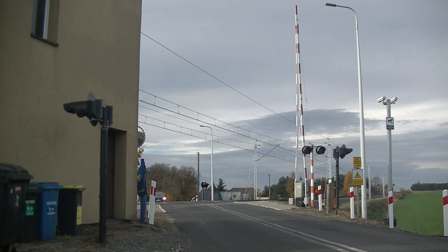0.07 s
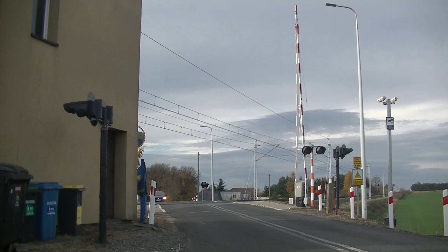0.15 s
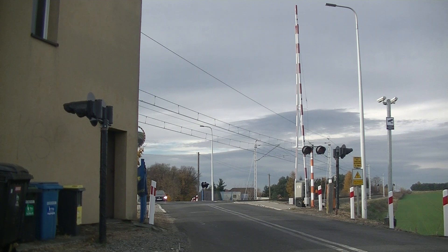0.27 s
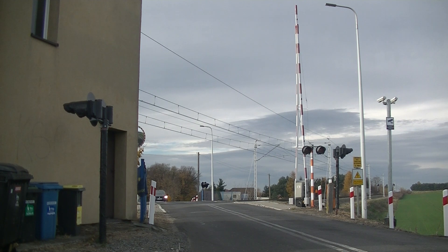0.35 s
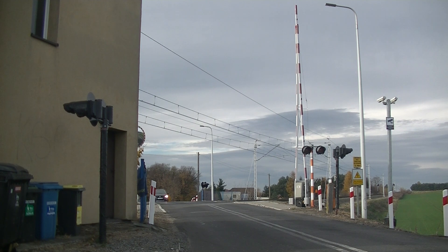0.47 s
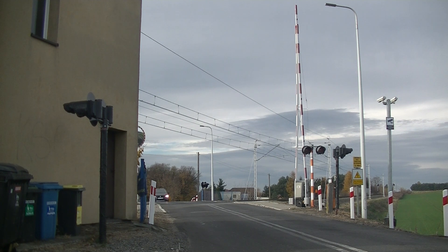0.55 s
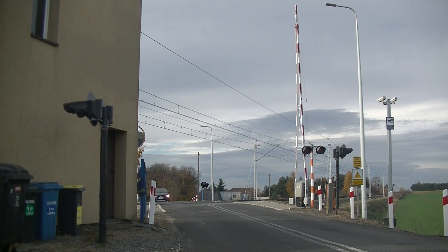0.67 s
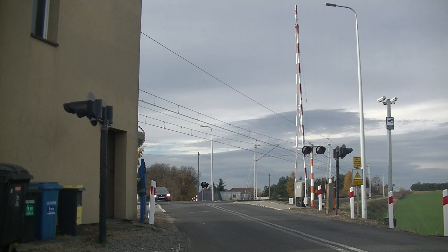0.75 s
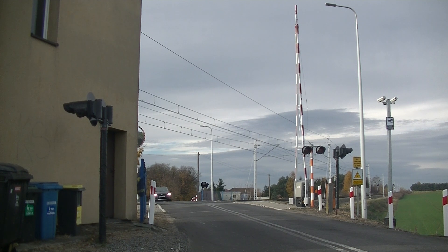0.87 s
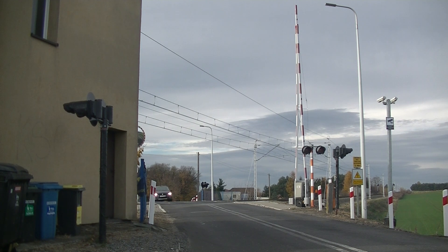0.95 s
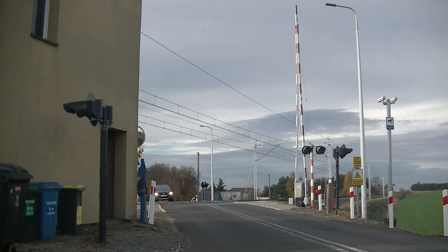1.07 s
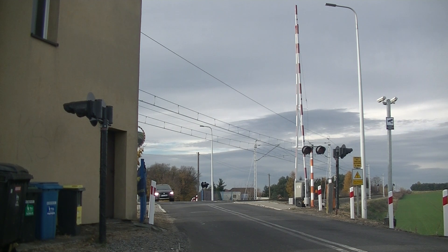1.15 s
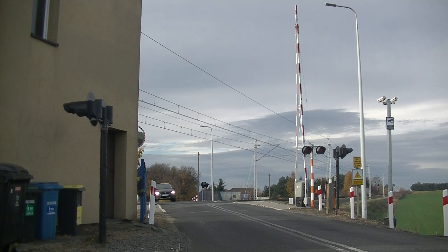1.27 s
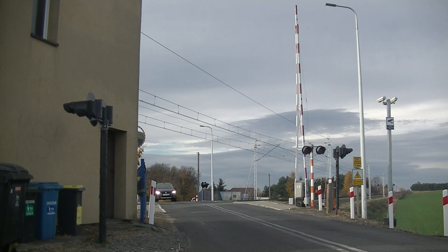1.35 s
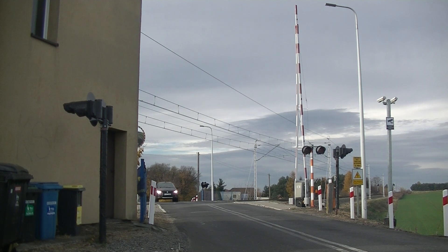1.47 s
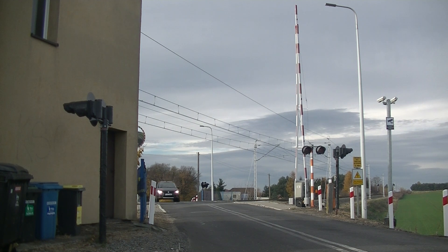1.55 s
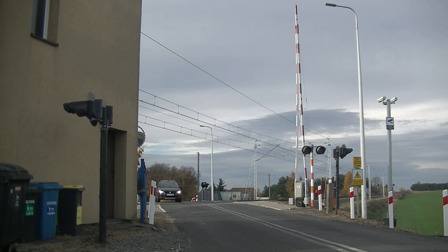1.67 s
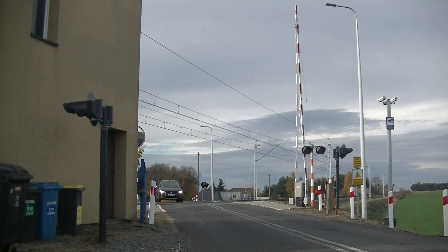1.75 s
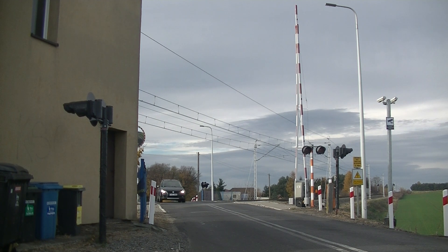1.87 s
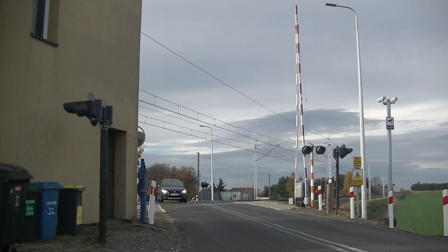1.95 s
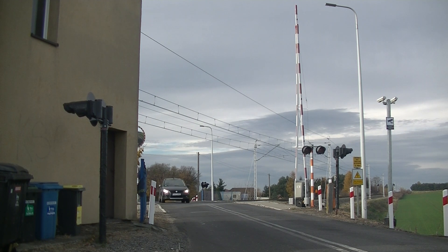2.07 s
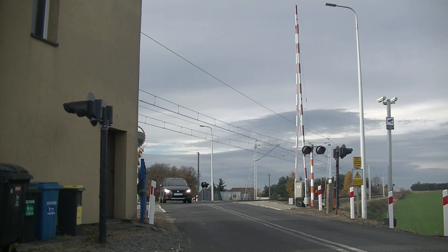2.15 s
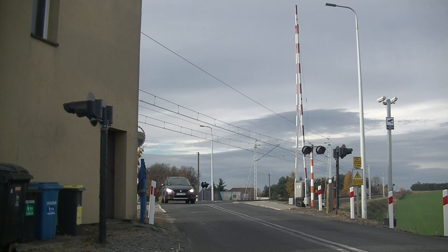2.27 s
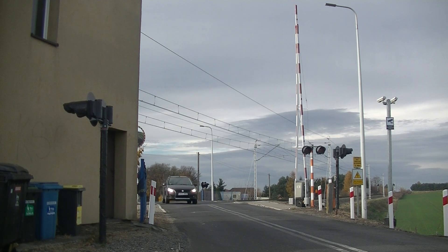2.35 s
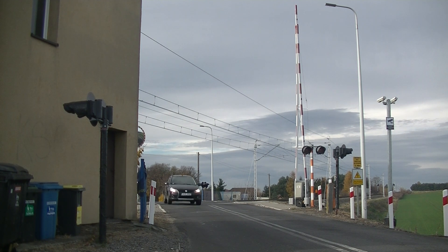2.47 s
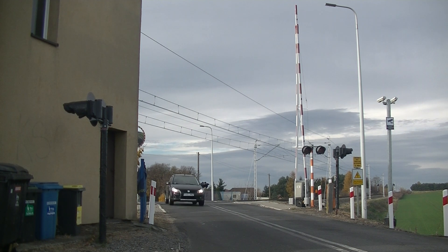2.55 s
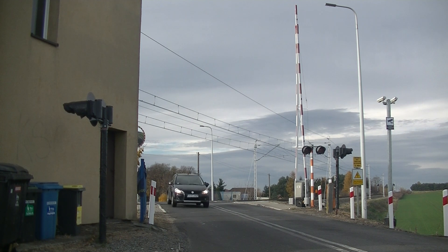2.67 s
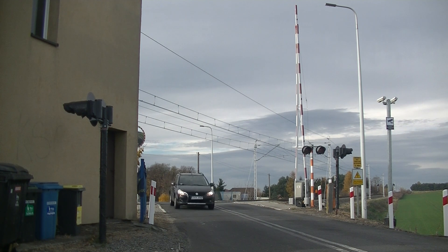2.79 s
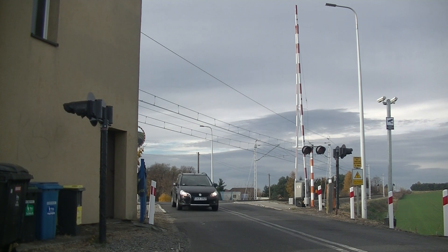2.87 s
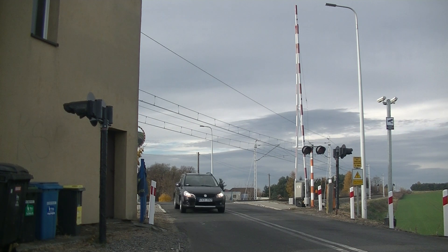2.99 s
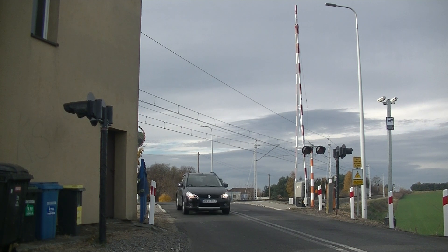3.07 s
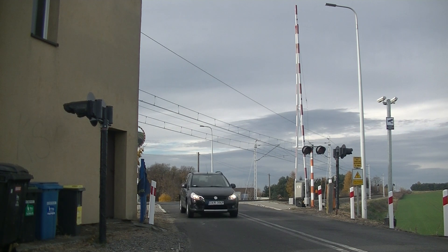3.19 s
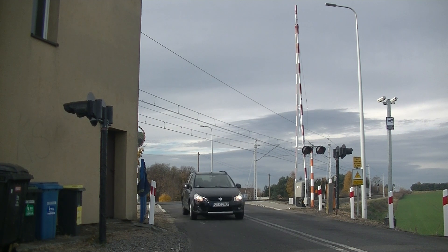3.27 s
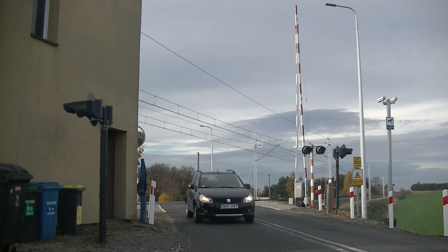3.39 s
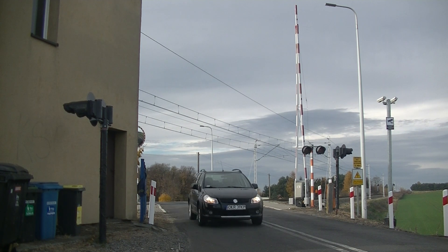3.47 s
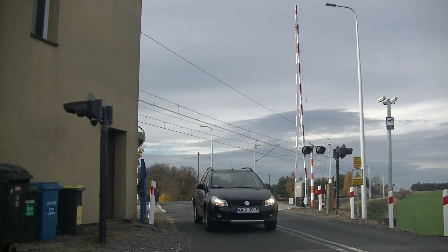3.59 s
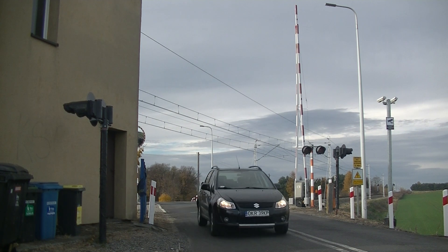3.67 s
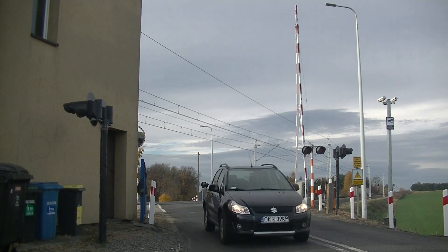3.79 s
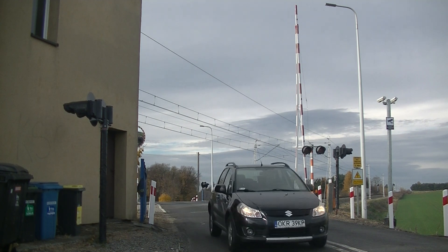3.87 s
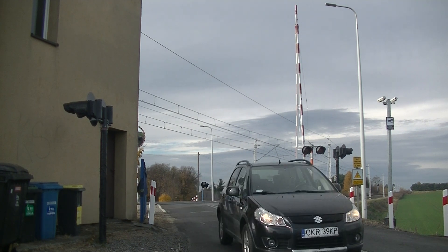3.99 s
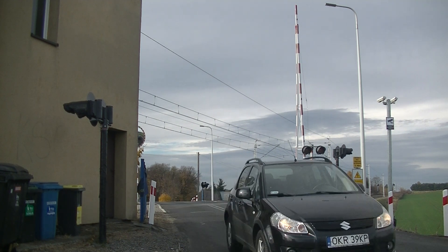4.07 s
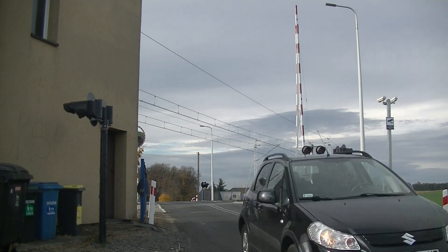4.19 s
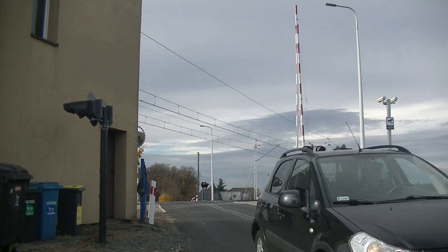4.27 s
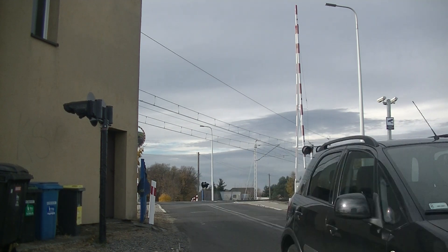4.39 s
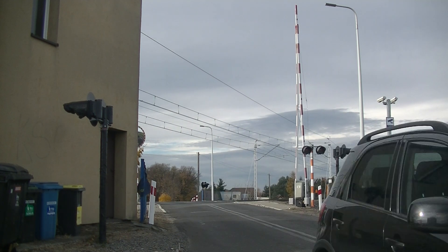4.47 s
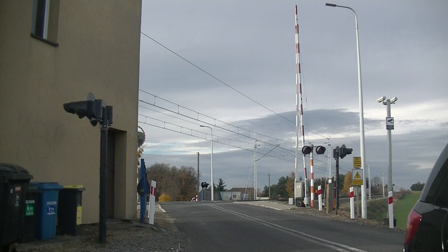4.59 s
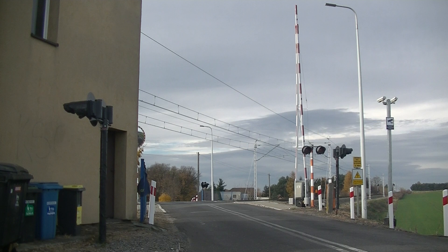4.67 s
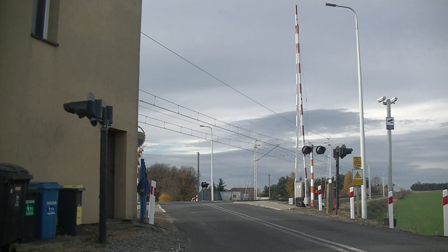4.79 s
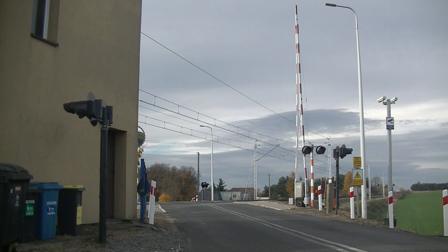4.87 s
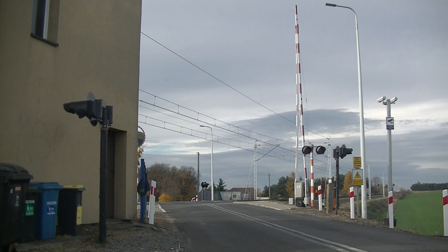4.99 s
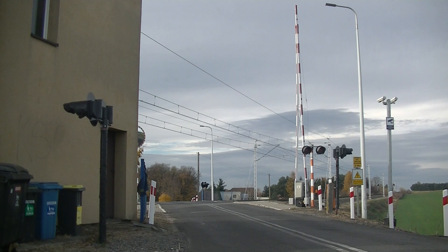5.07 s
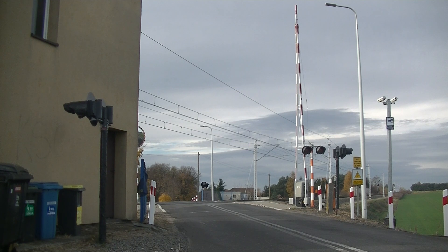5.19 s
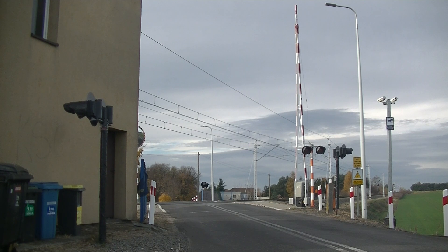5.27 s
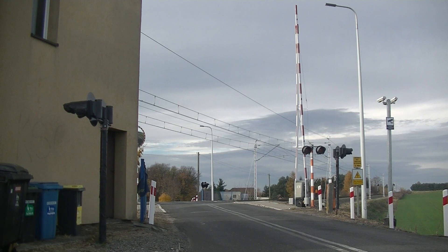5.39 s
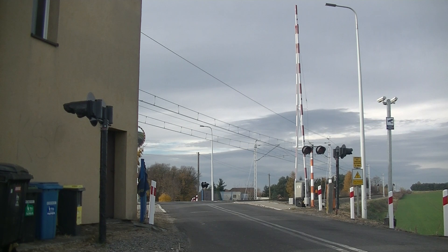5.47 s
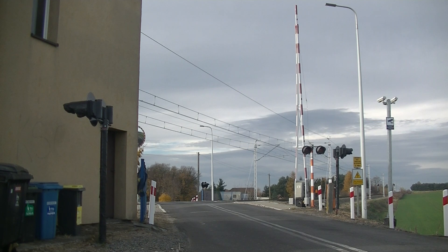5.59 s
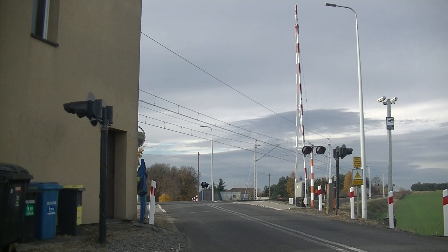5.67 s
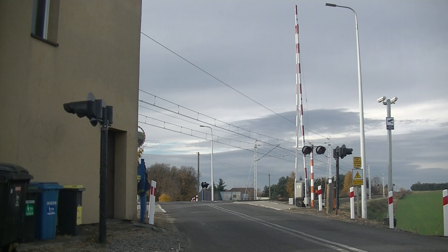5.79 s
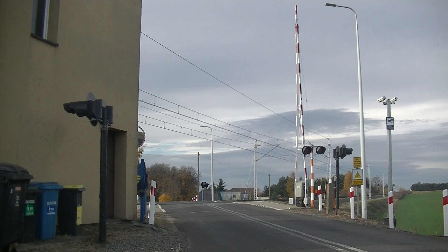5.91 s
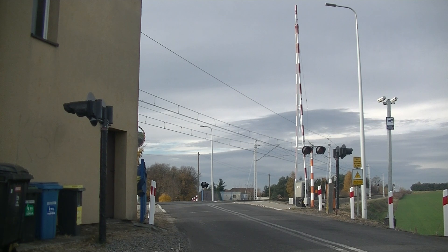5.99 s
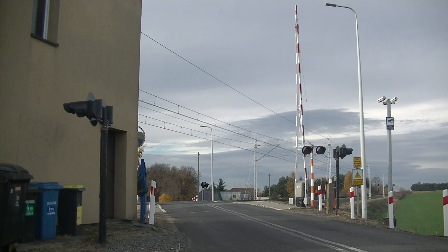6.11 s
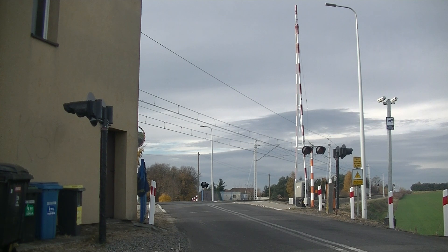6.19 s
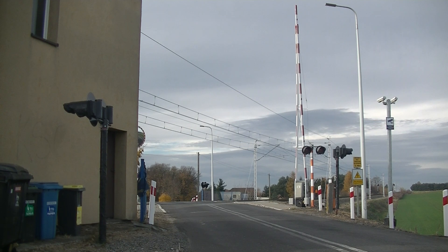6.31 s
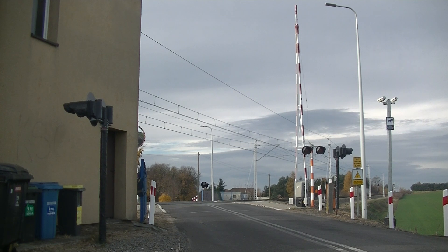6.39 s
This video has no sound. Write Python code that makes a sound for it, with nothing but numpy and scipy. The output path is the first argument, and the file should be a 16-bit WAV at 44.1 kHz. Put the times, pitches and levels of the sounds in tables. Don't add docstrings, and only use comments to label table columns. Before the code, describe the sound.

Quiet open roadside by a house wall, heard through two close microphones. From 0 s there is soft, broad distant road noise and hiss, with short low wind buffets mainly on the left and faint ticks; a small cluster of dull knocks comes around 0.9 s. From about 1 s a car's tyre hiss emerges ahead, rising clearly after 2.4 s as it comes over a level crossing, with grainy roar and small stone clicks around 2.5 to 3.6 s. Low thumps and gusts fall near 3.1 and 3.5 s. The roar grows fuller and brighter, with sharper clicks from 4.1 to 4.6 s, peaking around 4.4 to 4.8 s as the car passes very close. A faint engine hum slides down in pitch beneath. After 5 s the roar dulls and falls quickly, receding behind. Dull knocks at 5.8 and 6.2 s and dry rustles around 6 s close the scene.

```python
import sys
import numpy as np
from scipy import signal
from scipy.fft import rfft, irfft, next_fast_len
from scipy.io import wavfile
from scipy.ndimage import uniform_filter1d, map_coordinates

SR = 44100
rng = np.random.default_rng(int(sys.argv[2]) if len(sys.argv) > 2 else 0)


def wav_out(sig):
    wavfile.write(sys.argv[1], SR, np.round(np.clip(np.atleast_2d(sig).T, -1, 1) * 32767).astype(np.int16))


def natural_amplitude(level_db):
    exponent = np.asarray(level_db, float) / 20
    return 10 ** exponent


N = 284004
FRAME, HOP = 1024, 256
HZ = np.arange(FRAME // 2 + 1) * SR / FRAME
TIME = np.arange(N) / SR

# [f/Hz, level/dB per Hz]
FAR_COLOUR = [(15, -45), (25, -13), (40, -7), (90, -8), (215, -7), (350, -4.5), (600, -6), (1050, 1),
              (1310, -4), (1500, -0.5), (2780, -6.5), (4270, -16.5), (5300, -25), (7500, -25),
              (8500, -27.5), (11000, -31.5), (15500, -40)]
FAR_DB, FAR_SWAY_DB = -46, 0.9

# [peak t/s, peak level/dB, length/s]
GUSTS = [(0.036, -41, 0.032), (0.297, -58, 0.049), (.38, -54, 0.019), (.47, -49.5, 0.066),
         (.56, -46.5, 0.12), (.705, -39.5, 0.017), (.775, -42.5, 0.046), (.882, -43, 0.045),
         (1.105, -52, 0.12), (1.302, -57.5, 0.12), (2.08, -55, .09), (2.83, -46.5, 0.1), (2.98, -69, 0.057),
         (3.13, -49.5, 0.56), (3.445, -36.5, 0.027), (3.5, -37.5, 0.062), (3.716, -44.5, 0.074),
         (3.94, -52, 0.091), (4.07, -49, 0.045), (4.305, -38.5, 0.064), (4.75, -55, 0.16),
         (5.0, -50.5, 0.42), (5.264, -53, .1), (5.473, -50, 0.044), (5.59, -46, 0.092), (5.75, -38, 0.061),
         (5.805, -39.5, 0.04), (5.89, -48, 0.04), (5.995, -48.5, 0.084), (6.27, -53, 0.06)]
# [f/Hz, level/dB per Hz]
EDDY_COLOUR = [(18, -63), (30, -29), (100, -11.5), (173, -1.5), (250, 1), (322, 0), (501, -4), (673, -9),
               (918, -15), (1100, -13), (1500, -25), (1950, -45), (3300, -120)]
# [peak t/s, peak level/dB, length/s]
AIR_PUSHES = [(.3, -63, 0.11), (.6, -64, 0.12), (.98, -58, 0.23), (2.12, -59.5, 0.1), (2.72, -59, 0.092),
              (3.65, -60, .12), (5.1, -60, .1), (6.05, -62, .08)]
# [f/Hz, level/dB per Hz]
PUSH_COLOUR = [(20, -30), (45, -13), (110, -5), (200, -8.5), (400, -40), (1000, -90)]
GUST_DROP_DB, GUST_RISE = 9.5, 0.75
GUST_ROUND, CALM_DB = 0.99, -83

# [f/Hz, level/dB per Hz]
TYRE_AHEAD = [(90, -38), (150, -29), (300, -22), (620, -11.5), (950, 2.5), (1350, -2), (1750, -1),
              (2500, -4), (4150, -4.5), (4500, -10), (5000, -20.5)]
TYRE_ABEAM = [(90, -38), (150, -23), (370, -7), (620, -4), (970, 2.5), (1310, -5.5), (2000, -11),
              (2600, -10.5), (3050, -12.5), (3900, -7.5), (4500, -12.5), (5000, -7.5)]
TYRE_BEHIND = [(90, -40), (150, -28), (370, -10.5), (670, -8.5), (970, -5), (1310, -8), (1560, -7.5),
               (2700, -10), (3300, -8), (3700, -15), (4200, -13.5), (4700, -19.5), (5000, -20.5)]
# [f/Hz, level/dB per Hz]
HOUSING = [(4900, -0.5), (5800, -2), (7300, -6.5), (8200, -11), (9800, -12.5), (10900, -19.5),
           (11600, -19.5), (13300, -16), (15500, -25)]
# [t/s, tread hiss level/dB, shading 0 ahead colour, 0.5 abeam colour, 1 behind colour, road
# echo ridge f/Hz]; far off the colour is shaded too
COURSE = [(0, -53.5, 0.49, 1560), (.95, -49.5, 0.11, 1470), (1.2, -47, 0.12, 1600),
          (1.82, -46.5, 0.26, 1710), (1.86, -45.5, 0.25, 1700), (2.41, -39, 0.17, 1760),
          (2.45, -36, 0.28, 1684), (2.7, -31, 0.049, 1680), (3.122, -27, 0.0085, 1670),
          (3.4, -28, 0.024, 1730), (3.7, -24, 0.011, 1760), (4.35, -19, 0.013, 1850),
          (4.76, -20, 0.26, 2200), (4.84, -20, 0.53, 1810), (5.1, -24, 0.56, 1380), (5.45, -31.5, 1, 1600),
          (6.0, -34.5, 0.99, 1520), (6.44, -37, .99, 1430)]
# [t/s, 0 ahead to 1 behind]
BEARING = [(.6, 0.44), (1.0, 0), (4.32, 0.01), (4.45, 0.018), (4.75, 0.17), (4.95, .5), (5.15, 0.77),
           (5.4, 1)]
TREBLE_LEAD_S = 0.2
# [low f/Hz, high f/Hz]
TYRE_ZONES = [
    (750, 1350),
    (1500, 3000),
    (5000, 8000),
    (400, 700),
]
# [ahead/dB, abeam/dB, behind/dB, flank in view/dB, change/dB per dB of fading]
ZONE_BALANCE = [
    (-8, -5.5, -0.5, 2.5, 0.0945),
    (0.5, -1.5, 0.5, -0.46, 0.0085),
    (-21.5, -16.5, -20.5, 2.5, -0.0319),
    (-17.5, -11.5, -11.5, 3, 0.37),
]
NEAR_DB = -26
FLANK_START_S, FLANK_END_S, FLANK_EDGE_S = 4.06, 4.8, 0.026
SPARKLE_AHEAD_DB, SPARKLE_BEHIND_DB, SPARKLE_FLANK_DB = -8, -15.5, 3
SPARKLE_FADE = -0.19
SPARKLE_NEAR_DB, SPARKLE_CLOSE = -28.5, 0.46
RIDGE_DB, RIDGE_WIDTH = 4, 0.11
# [t/s, length/s, level change/dB, centre f/Hz]
PATCHES = [(0.73, 0.12, 6, 710), (1.87, 0.065, 5, 1600), (3.19, 0.064, 4, 5800), (3.6, 0.12, -5, 530),
           (4.6, 0.053, 2.5, 700), (6.1, 0.054, 2, 6000), (5.495, 0.1, 2.5, 6800), (5.815, 0.046, 5.5, 630),
           (6.15, 0.22, -4.5, 1500), (6.29, 0.089, 6.5, 820), (3.86, 0.43, 3, 6900), (4.64, 0.18, 4, 17000),
           (2.47, 0.032, 5.5, 1800), (8.9, 0.13, -1, 2400), (2.5, .2, -11, 180), (3.472, 0.031, 15.5, 480),
           (4.55, 0.11, 2, 720), (4.4, 0.15, 0.5, 940), (3.5, 0.32, -1.5, 2800), (5.5, 0.11, -2.5, 20000),
           (0.16, .06, -8, 220), (2.98, 0.11, -2.5, 3600), (4.89, 0.18, -5.5, 9600), (5.12, 0.14, 3, 2260),
           (4.7, 0.14, 1.5, 3800), (4.77, .04, 0.5, 3000), (4.24, .12, -1.5, 14000), (4.15, 0.1, -1, 1300),
           (2.5, .25, -6, 80), (1.7, 0.052, 1, 1800), (2.2, 0.2, 1, 4700), (4.3, .05, 1, 330),
           (5.38, 0.056, -0.5, 4000)]
PATCH_OCTAVES = 0.55
# [t/s, level/dB, f/Hz]
TYRE_FLARES = [(1.75, 7, 886), (1.87, 5, 938), (1.92, 3.5, 1648), (2.05, 8, 1797), (2.13, 6, 683),
               (2.47, 3.0, 1038), (2.63, 4, 1672), (2.97, 7, 1672), (3.15, 5.5, 1010), (3.34, 2.8, 1697),
               (3.63, 2.7, 1910), (3.68, 5, 1069), (3.72, 2, 1721), (4.07, 5, 915), (4.24, 3.5, 3770),
               (4.26, 6.5, 960), (4.27, 2.7, 1600), (4.39, 0, 1040), (4.59, 3.6, 1904),
               (4.74, 2.5, 1023), (5.19, 7, 1490), (5.26, 6, 780), (5.4, 5, 1000), (5.85, 6.5, 864),
               (6.27, 1, 886), (6.29, 11, 1084),
               (2.75, 2, 4500), (3.2, -1, 4500), (3.7, 1, 4500), (4.1, 2.5, 4480), (4.45, 3, 1680),
                 (4.57, 2, 4230), (4.65, -2, 4300), (4.73, 2.5, 4240), (4.75, 2, 2150), (4.85, 5, 840),
                 (4.89, 3, 1500), (4.97, 3, 1010), (5.07, 1, 1470), (5.07, 2, 2500), (5.72, 6.5, 940)]
FLARE_S, FLARE_OCTAVES = 0.06, 0.07

# [f/Hz, left minus right level/dB, left lead/rad, likeness 0-1]
PORTS_AHEAD = [(200, -1.5, 0, .99), (800, -1.5, 0, .992), (1100, -.3, 0, .9995), (2250, 0, 0, .9995),
               (3200, -4, -.05, .99), (4300, -2.5, 0, .99), (5100, -4.5, .3, .85), (5500, 2, 1.1, .85),
               (6100, 4.5, .3, .93), (7100, 10.5, -.5, .7), (8200, -.5, -1.6, .85), (9300, -5.5, -.6, .85),
               (11000, -1, 0, .94), (15000, -.2, 0, .94)]
PORTS_ABEAM = [(200, -.8, 0, .995), (900, -.2, 0, .999), (1300, .2, -.04, .98), (1800, 2, -.2, .86),
               (2400, 3, -.45, .72), (3200, 0, -.45, .48), (4200, -2.5, -.5, .65), (5000, -5.5, -1.1, .42),
               (6200, -2.3, -.5, .62), (8100, -1, -1.1, .52), (9300, -5.5, -1.9, .3),
               (11000, -1.3, -3.8, .25), (15000, -2, -5, .3)]
PORTS_BEHIND = [(200, -.5, .08, .98), (800, -.5, .06, .99), (1050, -.2, .03, .998), (1500, .2, .03, .996),
                (2200, 2.5, .12, .92), (3300, 5.5, .4, .85), (4200, 2.5, .3, .42), (5000, -7.5, -.4, .05),
                (5550, -5, -1.6, .38), (6200, -3, -.4, .32), (7100, -.2, 0, .38), (8100, -.7, -.2, .75),
                (9300, -2.5, -.8, .2), (15000, -.5, .3, .1)]

# [t/s, peak level/dB, ring f/Hz]
STONES = [(.0524, -55, 7000), (.1152, -54, 7000), (.6026, -55, 7000), (.6861, -54, 7000),
          (.7184, -50, 7000), (2.2966, -47, 6000), (2.479, -23, 1800), (2.637, -19, 1800),
          (2.6435, -17, 1800), (2.8884, -16, 1800), (3.4186, -17, 1900), (3.6166, -15, 1900),
          (3.7272, -53, 13000), (4.0682, -7, 1900), (4.1149, -9, 2000), (4.4128, -9, 2000),
          (4.4565, -39, 12860), (4.6025, -5, 2100), (4.6593, -25, 6500), (4.7295, -42, 13000),
          (4.8685, -14, 1490), (5.1379, -52, 13000), (5.9746, -43, 6500), (6.0235, -41, 7000),
          (6.031, -41, 7000), (6.0783, -40, 7700), (6.13, -42, 6500), (6.2237, -46, 6500),
          (6.2715, -24, 1500)]
STONE_CYCLES = 0.82
# [t/s, peak level/dB, ring f/Hz, t60/s]
KNOCKS = [(.8699, -26, 1250, .016), (.8835, -28, 400, .025), (.9042, -18, 600, .021),
          (.9095, -25, 600, .024), (.9155, -19, 610, .024), (.9198, -24, 680, .018), (.9245, -35, 600, .03),
          (1.10, -34, 400, .03), (1.681, -32, 690, .02), (3.143, -19, 380, .013), (3.44, -23, 480, .015),
          (3.492, -19, 400, .016), (5.752, -30, 250, .03), (5.79, -27, 950, .04), (5.8405, -25, 870, .04),
          (5.845, -23, 870, .03), (6.217, -24, 910, .05), (6.271, -21, 880, .03)]
KNOCK_PUSH_S = 0.0004
# [t/s, level/dB, length/s]
RUSTLES = [(1.406, -47, .008), (2.147, -47, .01), (3.914, -36, .003), (5.031, -42, .003),
           (5.135, -30.5, .006), (5.157, -40, .004), (5.923, -45, .02), (5.965, -44, .02),
           (6.018, -37.5, 0.027), (6.066, -39, 0.027), (6.124, -42.5, 0.026), (6.172, -47, .015),
           (6.222, -55, .012), (6.273, -52, .012)]
# [t/s, firing f/Hz, level/dB]
ENGINE = [(3.6, 122.2, -62), (4.2, 119.3, -68), (4.55, 116.5, -62), (4.8, 113, -60), (5.1, 109.8, -60.5),
          (5.35, 113.6, -64), (5.8, 108, -75)]


def level(x, db):
    return x * natural_amplitude(db) / np.sqrt(np.mean(x ** 2))


def shape(hz, table, column=1):
    table = np.array(table, float)
    return np.interp(np.log(np.maximum(hz, 1)), np.log(table[:, 0]), table[:, column])


def colour(x, table):
    size = next_fast_len(N)
    hz = np.arange(size // 2 + 1) * SR / size
    return irfft(rfft(x, size) * natural_amplitude(shape(hz, table)), size)[..., :N]


def walk(rate, count=1):
    k = max(int(SR / rate), 1)
    held = np.repeat(rng.standard_normal((count, N // k + 1)), k, axis=1)[:, :N]
    return 1.15 * uniform_filter1d(uniform_filter1d(held, k), k)


def frames(x):
    return signal.stft(x, SR, nperseg=FRAME, noverlap=FRAME - HOP)[1:]


def swell(rows):
    power = np.zeros(N)
    for s, db, size in rows:
        away = np.maximum(TIME - s, (s - TIME) / GUST_RISE) / size
        power += natural_amplitude(db - GUST_DROP_DB * away ** GUST_ROUND) ** 2
    return power


def thirds(behind):
    behind = np.clip(behind, 0, 1)
    return [np.clip(1 - 2 * abs(behind - k / 2), 0, 1) for k in range(3)]


def bumps(s, at, size, db, hz, octaves):
    in_pitch = db * np.exp(-(np.log2((HZ[:, None] + 1) / hz) / octaves) ** 2)
    in_time = np.exp(-((s - at[:, None]) / size) ** 2)
    return in_pitch @ in_time


def ports(a, b, shares):
    tables = [PORTS_AHEAD, PORTS_ABEAM, PORTS_BEHIND]
    pan_db, lead, like = (sum(shape(HZ, table, column)[:, None] * share
                              for table, share in zip(tables, shares)) for column in (1, 2, 3))
    like = np.clip(like, 0, 1)
    mid = a * np.sqrt((1 + like) / 2)
    side = b * np.sqrt((1 - like) / 2)
    tilt = natural_amplitude(pan_db / 2) * np.exp(.5j * lead)
    pair = np.array([(mid + side) * tilt, (mid - side) / tilt])
    return signal.istft(pair, SR, nperseg=FRAME, noverlap=FRAME - HOP)[1][:, :N]


def distance():
    a, b = rng.standard_normal((2, N)) * natural_amplitude(FAR_SWAY_DB * walk(6.9))
    mid = colour(a, [(3000, -8.5), (7000, -10.5), (14000, -5)])
    side = colour(b, [(50, -20), (400, -19), (1000, -33), (1900, -22), (3000, -15.5), (7000, -11), (14000, -6)])
    return level(colour(np.array([mid + side, mid - side]), FAR_COLOUR), FAR_DB)


def wind(leak_db, own_db):
    eddies = colour(rng.standard_normal((2, N)) * natural_amplitude(6.0 * walk(70, count=2)), EDDY_COLOUR)
    nearby = uniform_filter1d(eddies ** 2, 1500)
    left, right = eddies / np.sqrt(nearby + 0.063 * np.mean(eddies ** 2))
    gust = natural_amplitude(8.5) * np.sqrt(swell(GUSTS) + natural_amplitude(CALM_DB) ** 2)
    pair = gust * np.array([left, natural_amplitude(leak_db) * left + natural_amplitude(own_db) * right])
    return signal.sosfilt(signal.butter(2, 70, "high", fs=SR, output="sos"), pair)


def tyre_tone(s, hiss_db, behind, ridge_hz):
    shares = thirds(behind)
    fading_db = NEAR_DB - hiss_db
    to_edge_s = np.minimum(s - FLANK_START_S, FLANK_END_S - s)
    flank = np.clip(to_edge_s / FLANK_EDGE_S + .5, 0, 1)
    tables = [TYRE_AHEAD, TYRE_ABEAM, TYRE_BEHIND]
    tone = sum(np.outer(shape(HZ, table), share) for table, share in zip(tables, shares))
    tone += RIDGE_DB * np.exp(-(np.log(np.outer(HZ + 1, 1 / ridge_hz)) / RIDGE_WIDTH) ** 2)
    edge = np.searchsorted(HZ, 5000)
    tone[edge:] = tone[edge] + (shape(HZ[edge:], HOUSING) - shape(HZ[edge], HOUSING))[:, None]
    sparkle_db = SPARKLE_AHEAD_DB * (1 - behind) + SPARKLE_BEHIND_DB * behind + SPARKLE_FLANK_DB * flank
    sparkle_db += SPARKLE_FADE * fading_db * (1 - behind)
    sparkle_db += SPARKLE_CLOSE * np.maximum(hiss_db - SPARKLE_NEAR_DB, 0)
    tone += np.outer(np.clip((HZ - 7500) / 4000, 0, 1), sparkle_db)
    wanted = hiss_db + np.array(ZONE_BALANCE) @ np.array([*shares, flank, fading_db])
    have = []
    for low, high in TYRE_ZONES:
        power = np.sum(natural_amplitude(tone[(HZ > low) & (HZ < high)]) ** 2, axis=0)
        have.append(10 * np.log10(power / len(HZ)))
    centre = np.sqrt(np.prod(TYRE_ZONES, axis=1))
    rank = np.argsort(centre)
    place = np.interp(np.log(HZ + 1), np.log(centre[rank]), np.arange(len(rank)))
    grid = np.meshgrid(place, np.arange(len(s)), indexing="ij")
    return tone + map_coordinates(np.subtract(wanted, have)[rank], grid, order=1)


def road_waver(count):
    bands = walk(14, count=24)[:, np.minimum(np.arange(count) * HOP, N - 1)]
    rows = np.clip(3 * np.log2((HZ + 1) / 80), 0, 23)
    return map_coordinates(bands, np.meshgrid(rows, np.arange(count), indexing="ij"), order=1)


def roar_changes(s):
    at, size, db, hz = np.transpose(PATCHES)
    marks = bumps(s, at, size[:, None], db, hz, PATCH_OCTAVES)
    at, db, hz = np.transpose(TYRE_FLARES)
    return marks + bumps(s, at, FLARE_S, db, hz, FLARE_OCTAVES)


def tyres(grit_db, patch_db, flicker_db):
    uneven_db = grit_db * walk(900) + patch_db * walk(40) + 0.12 * walk(9)
    hail = rng.standard_normal((2, N)) * natural_amplitude(uneven_db)
    s, (a, b) = frames(level(hail, 0))
    when, *course = np.transpose(COURSE)
    hiss_db, behind, ridge_hz = (np.interp(s, when, c) for c in course)
    tone = tyre_tone(s, hiss_db, np.clip(behind, 0, 1), ridge_hz)
    gain = natural_amplitude(tone + roar_changes(s) + flicker_db * road_waver(len(s)))
    lead = TREBLE_LEAD_S * np.clip((HZ - 10000) / 1500, 0, 1)
    bearing = np.interp(s + lead[:, None], *np.transpose(BEARING))
    return ports(a * gain, b * gain, thirds(bearing))


def stones():
    out, t = np.zeros(N), np.arange(-200, 200) / SR
    for s, db, hz in STONES:
        click = natural_amplitude(db) * np.sin(2 * np.pi * hz * t) * np.exp(-(t * hz / STONE_CYCLES) ** 2)
        out[int(s * SR) - 200:][:len(t)] -= click
    return out


def rumble():
    air = level(colour(rng.standard_normal(N), PUSH_COLOUR), 0)
    return natural_amplitude(4.5) * np.sqrt(swell(AIR_PUSHES)) * air


def knocks():
    out, t = np.zeros(N), np.arange(SR // 8) / SR
    for s, db, hz, t60 in KNOCKS:
        ring = np.zeros(len(t))
        for ratio, part_db in [(1, -1), (1.6, -9), (2.4, -10), (5.9, -23)]:
            decay = natural_amplitude(-60 * t * ratio ** 0.24 / t60)
            ring += natural_amplitude(part_db) * np.sin(2 * np.pi * hz * ratio * t) * decay
        start = int(s * SR)
        blow = natural_amplitude(db) * ring * np.minimum(t / KNOCK_PUSH_S, 1)
        out[start:][:len(t)] -= blow[:N - start]
    return signal.sosfilt(signal.butter(1, 150, "high", fs=SR, output="sos"), out)


def rustles():
    scrape = np.zeros(N)
    for s, db, size in RUSTLES:
        rise = np.clip((TIME - s) / (0.23 * size), 0, 1)
        scrape += natural_amplitude(db) * rise * np.exp(-(np.maximum(TIME - s, 0) / size) ** 2)
    mid, side = rng.standard_normal((2, N)) * natural_amplitude(2.0 * walk(1500))
    pair = np.array([mid + .5 * side, 1.2 * (mid - .5 * side)])
    pair = colour(pair, [(1500, -16), (3500, 6), (5000, 0.5), (7800, -6.0), (9000, -16), (11000, -25),
                         (13000, -28), (15000, -32)])
    return scrape * level(pair, 0)


def engine():
    t, hz, db = np.transpose(ENGINE)
    firing_hz = np.interp(TIME, t, hz) * (1 + 0.012 * walk(30.4)[0])
    phase = 2 * np.pi * np.cumsum(firing_hz) / SR
    fade = np.interp(TIME, [t[0], t[0] + 0.35, t[-1] - .4, t[-1]], [0, 1, 1, 0])
    hum = np.sin(phase) + natural_amplitude(-8) * np.sin(2 * phase) + natural_amplitude(-6) * np.sin(phase * 5 / 2)
    return np.sqrt(2) * hum * fade * natural_amplitude(np.interp(TIME, t, db) + 0.61 * walk(10)[0])


def scene():
    weather = wind(leak_db=-7.5, own_db=-13) + rumble()
    car = tyres(grit_db=1.0, patch_db=0.61, flicker_db=0.58) + stones() + engine()
    return distance() + weather + car + knocks() + rustles()


def low_pass(x):
    return signal.sosfilt(signal.butter(12, 15740, fs=SR, output="sos"), x)


def record(dry):
    return low_pass(dry)


dry = scene()
out = record(dry)
wav_out(out)
```